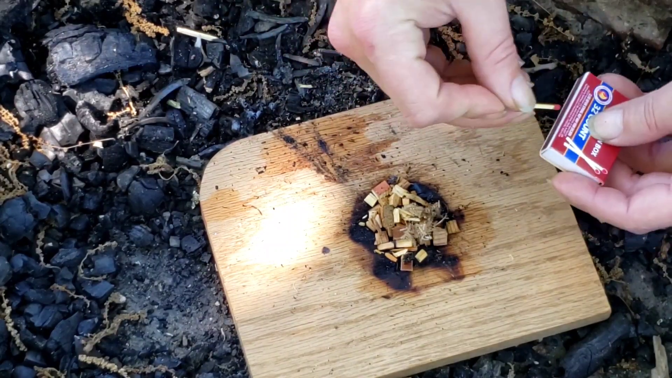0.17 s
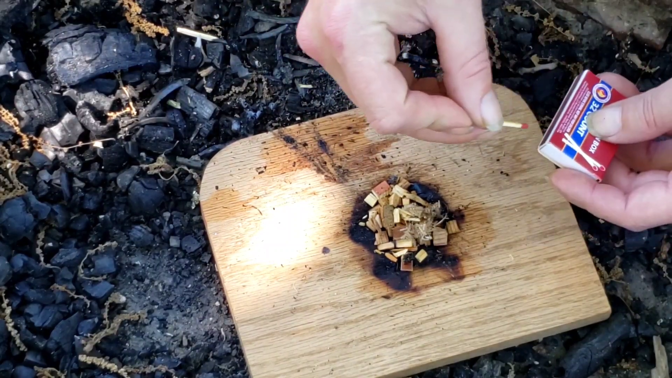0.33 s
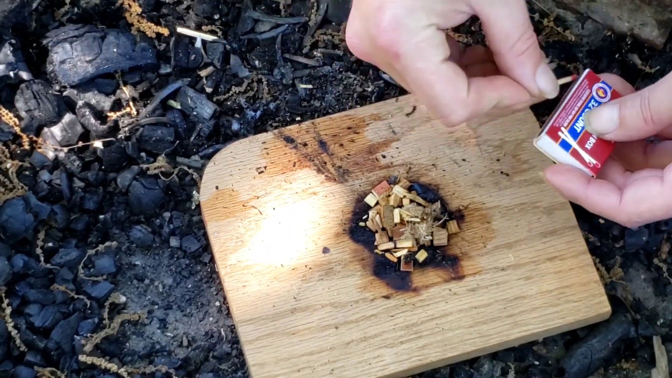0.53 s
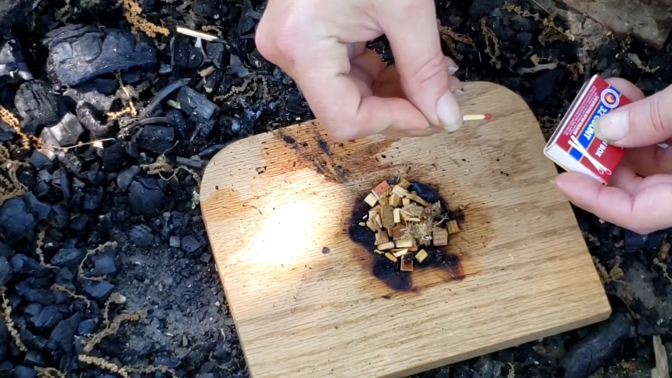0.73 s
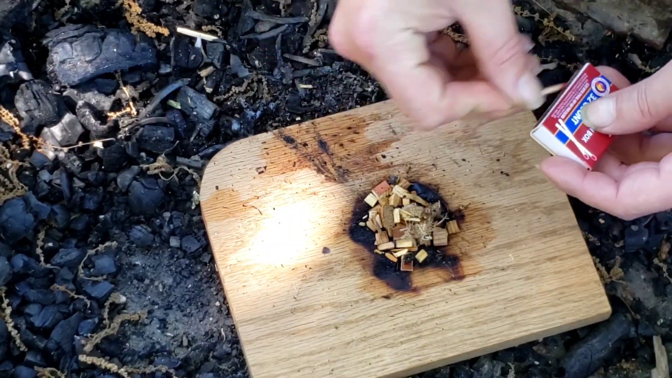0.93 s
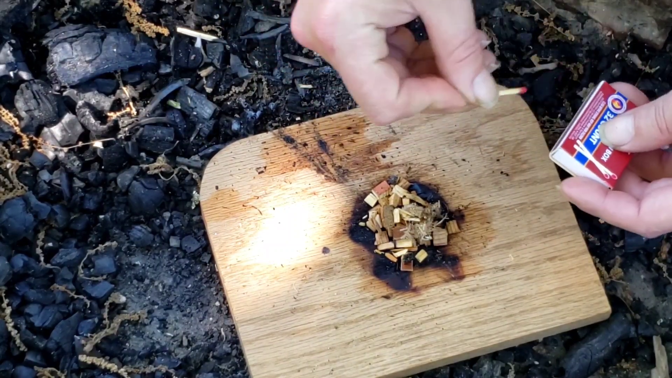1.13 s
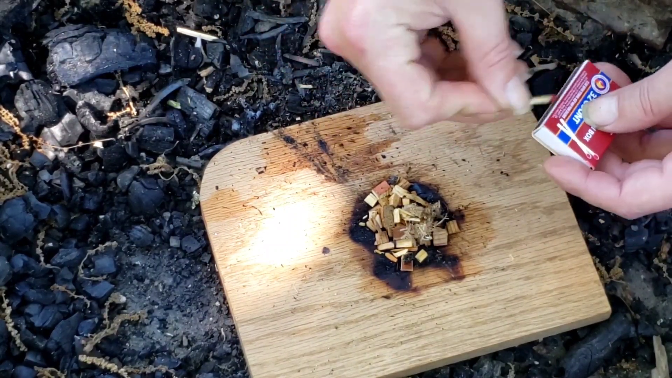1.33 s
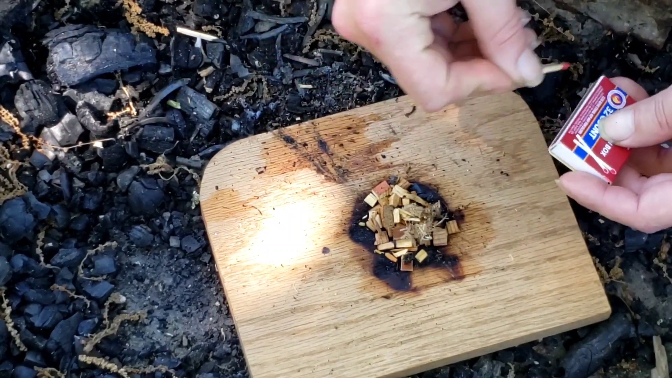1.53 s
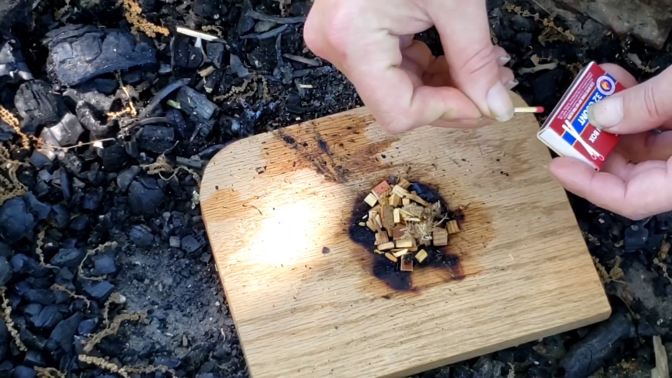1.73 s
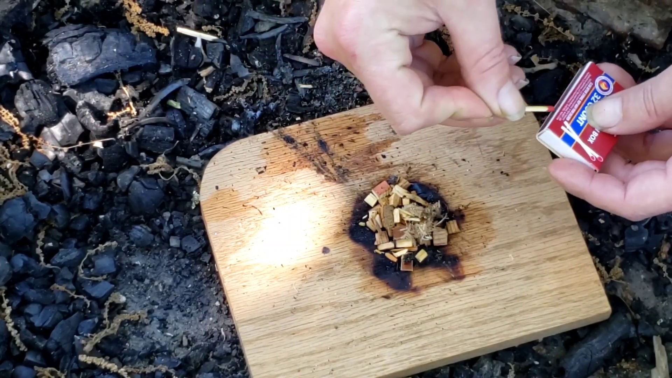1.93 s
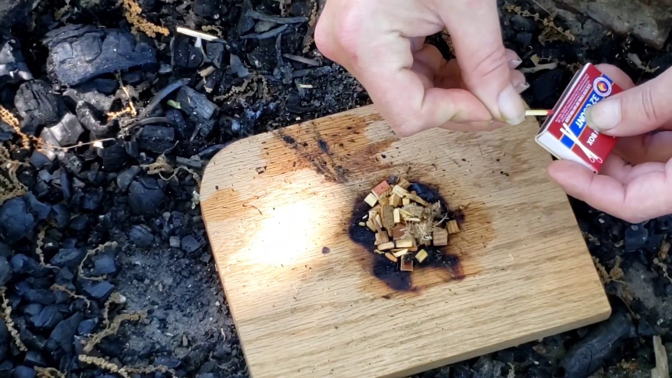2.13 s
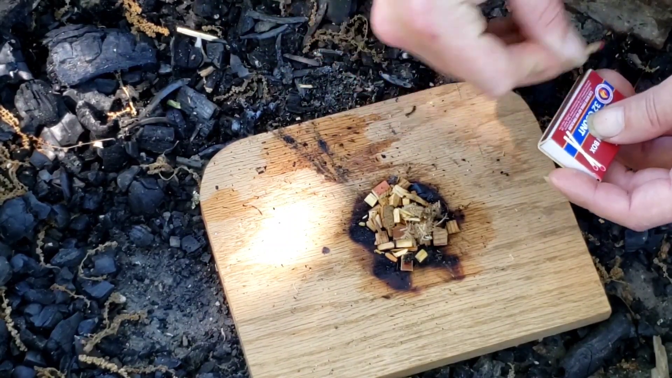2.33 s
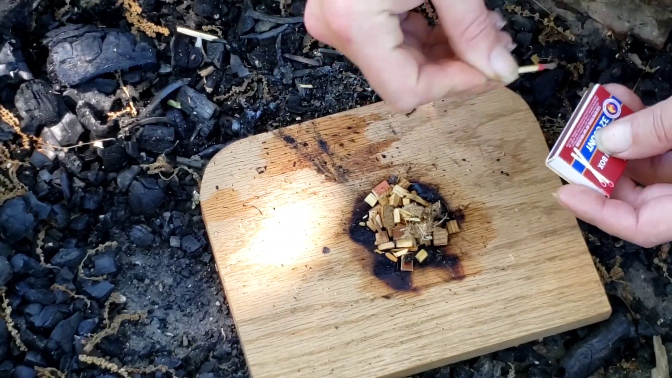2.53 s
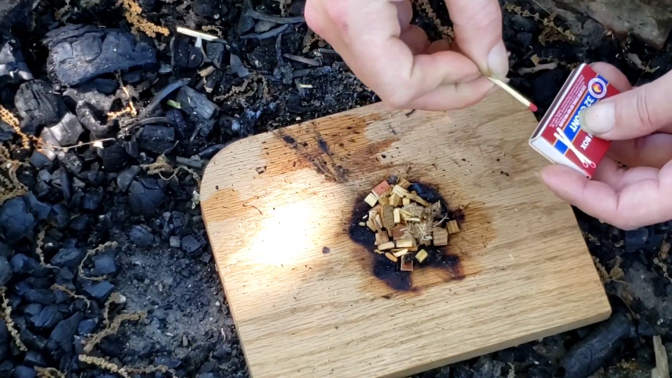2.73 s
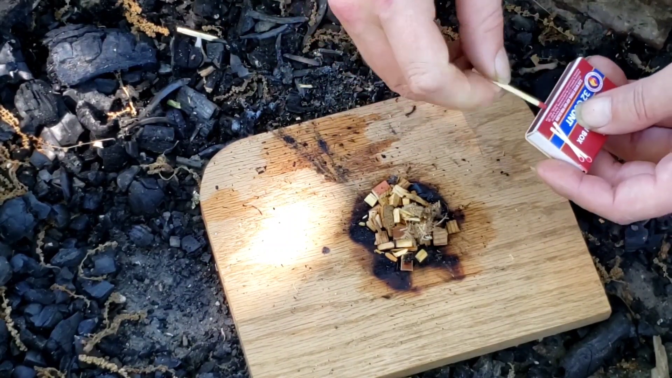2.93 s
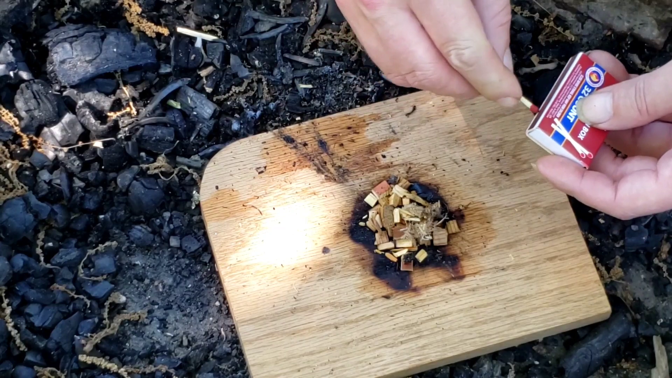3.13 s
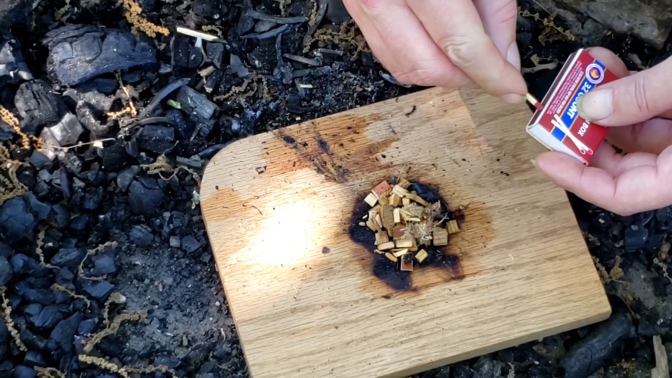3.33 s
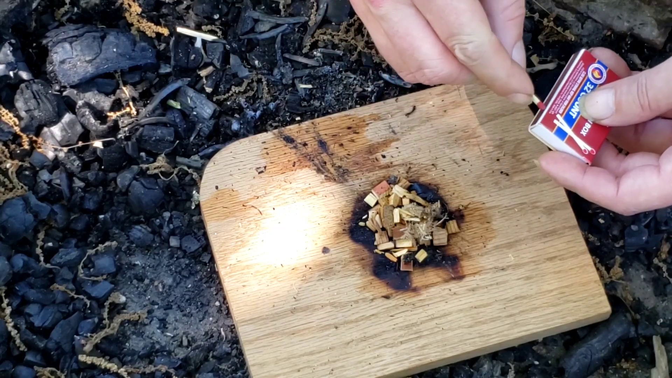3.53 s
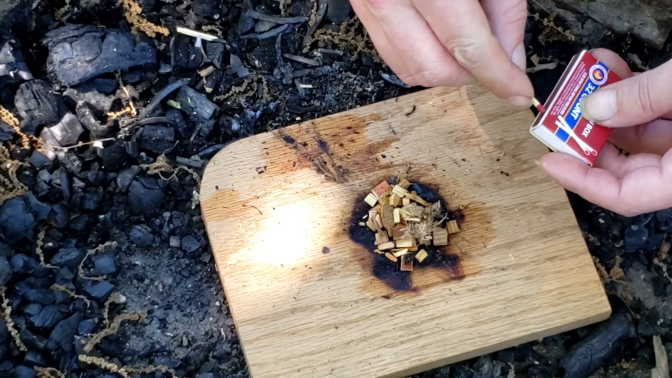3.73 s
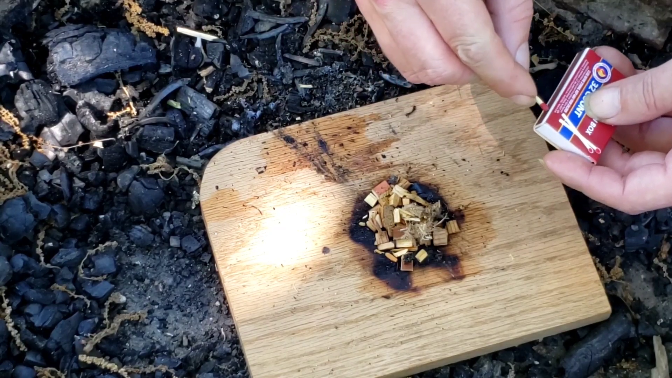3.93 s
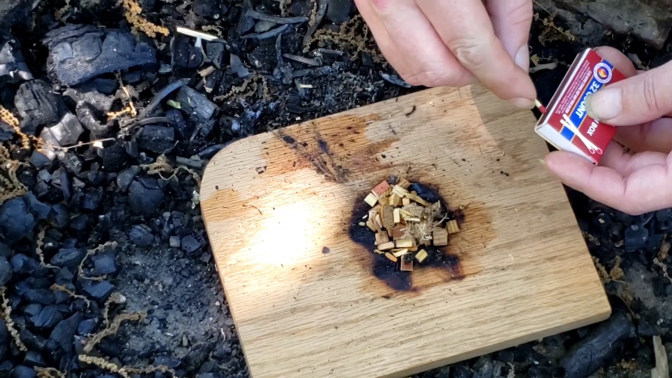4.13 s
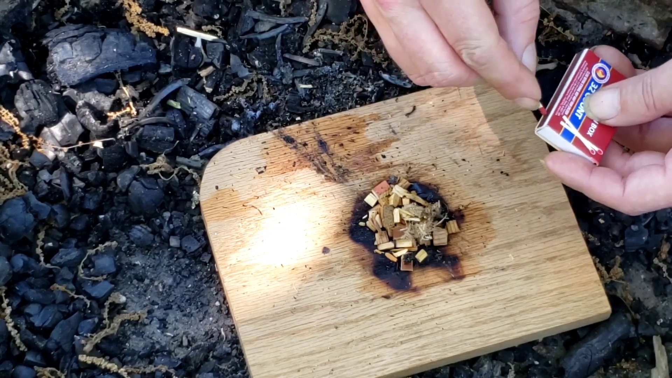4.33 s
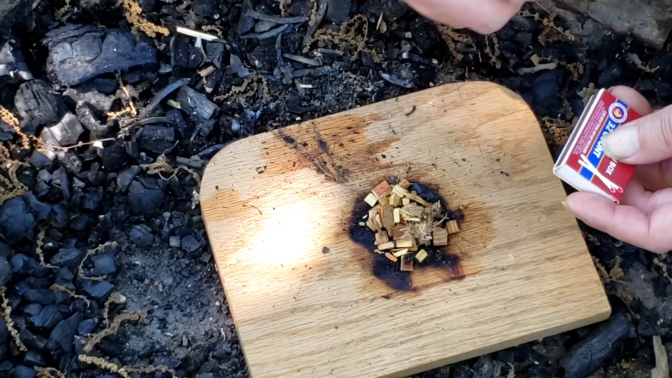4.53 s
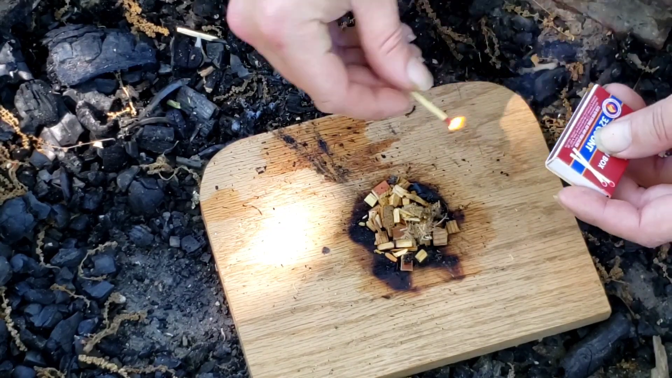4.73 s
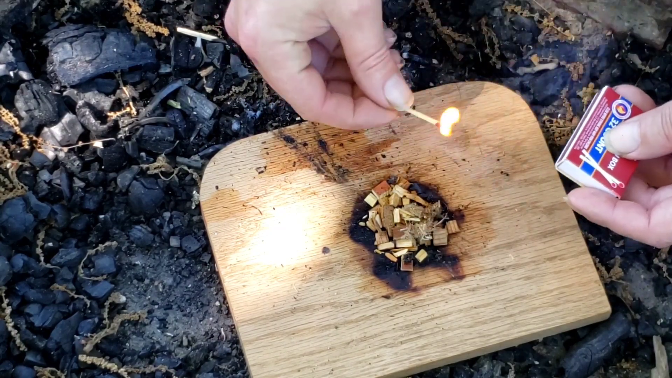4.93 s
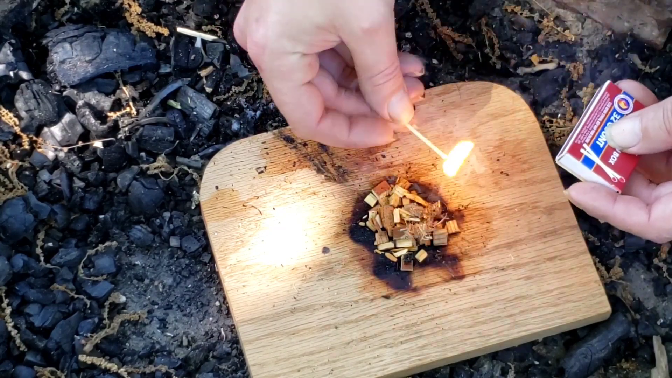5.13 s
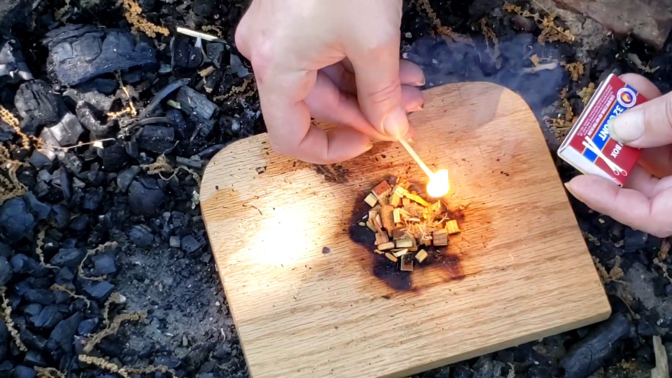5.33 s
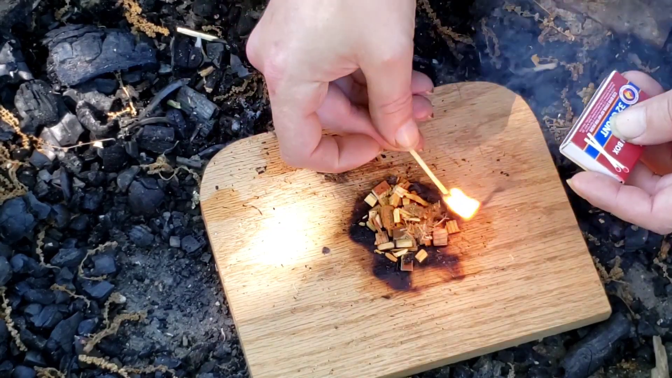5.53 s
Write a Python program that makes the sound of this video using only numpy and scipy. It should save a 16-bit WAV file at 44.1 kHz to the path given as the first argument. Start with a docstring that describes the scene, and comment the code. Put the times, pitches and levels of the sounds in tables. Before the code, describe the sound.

Close, short match strikes on a cardboard box end in a crackling flare and faint hiss, outdoors with wind on the microphone.

```python
"""Striking a match outdoors

Close to the microphone, a match scrapes four times along its box and catches on the fifth stroke.
Grit rings the small cardboard box; the head bursts alight, then hisses and ticks as it burns.
Birds whistle in the distance and a far engine hums, under wind rumbling on the microphone."""
import sys
import numpy as np
from scipy import signal
from scipy.fft import rfft, irfft, next_fast_len
from scipy.io import wavfile
from scipy.ndimage import uniform_filter1d, map_coordinates

SR = 44100
rng = np.random.default_rng(int(sys.argv[2]) if len(sys.argv) > 2 else 0)


def generate_wav(signal):
    """Clip the signal to [-1, 1] and save it as 16-bit WAV at the path in sys.argv[1]."""
    frames = np.transpose(np.atleast_2d(signal))
    scaled = np.clip(frames, -1, 1) * 32767
    pcm = np.round(scaled).astype(np.int16)
    wavfile.write(sys.argv[1], SR, pcm)


N = 245985
TIME = np.arange(N) / SR

# Table levels are relative: each source is filtered and balanced afterwards.
# strokes on the striker: (time [s], length [s], peak after [s], level [dB], build-up [dB], fade [dB],
# box tuning [ratio], further tuning of lowest modes [ratio], of top modes [ratio],
# low modes [dB], high modes [dB], top modes [dB], grit [dB])
STROKES = [(0.5756, 0.072, 0.018, -35.5, 4.5, 10.5, 1.07, 1.05, 1.01, -9, -2.5, -1.5, -10),
           (1.0209, 0.049, 0.0068, -39.5, 13, 1.5, 1.056, 1.46, 0.97, -9.5, 0.5, 4.5, -8),
           (1.4432, 0.059, 0.028, -44.5, 7, 11, 1.02, 1, 1.06, -8, 6, 11.5, 0),
           (2.387, 0.04, 0.023, -38, 1, 0, .99, 1.02, 1.04, 0.5, -5.5, -4, -7),
           (4.486, 0.037, 0.0086, -38.5, 21, 3.5, 0.97, 1.35, 1.04, 10, -10, 10, 6)]
# soft knocks and brushes on the box, and one dull puff of the flame:
# (time [s], level [dB], decay [s], treble edge [Hz], box ring [dB])
TAPS_AND_PUFF = [(0.751, -57, 0.0049, 4000, -2), (2.3834, -26.5, 0.0057, 1250, 5.5),
                 (3.046, -65, 0.032, 15000, -13), (3.054, -58.5, 0.011, 15100, -20),
                 (4.788, -51, 0.012, 1100, 7)]
# coarse grains snapping: (time [s], click [dB], knock on the box [dB])
SNAPS = [(0.5783, -36, -31), (0.5875, -30, -35), (0.5969, -27.5, -39), (1.028, -39, -32), (1.06, -33, -32),
         (1.453, -42, -43), (1.4713, -28, -44), (1.502, -42, -41), (2.379, -45, -42), (2.405, -45, -29),
         (2.423, -50, -27), (2.425, -39, -24.5), (4.4893, -22, -40), (4.533, -30.5, -34)]
# resonances of box and drawer, and the dips between them: (frequency [Hz], width [Hz], gain [dB])
BOX_MODES = [(794, 110, -12), (1072, 91, -10), (1495, 71, -3.5), (1797, 125, 1), (2070, 22, -3.5),
             (2240, 90, 3), (2660, 31, -6), (2920, 64, -5.5), (3440, 96, 0), (3745, 175, -1.5),
             (4080, 130, -6.5), (4570, 190, -5), (5170, 130, -14)]
BOX_DIPS = [(650, 89, -12), (1303, 51, -8.5), (2730, 100, -5.5), (3080, 96, -5.5), (4150, 84, -2.5),
            (5700, 560, -5.5), (9400, 650, -6.5)]
# the head catching: (time [s], level [dB], decay [s])
SPURTS = [(4.4952, -21.5, 0.0089), (4.5055, -20.5, 0.0033), (4.5195, -24, 0.0029)]
# body and treble of the flame's hiss: (time [s], level [dB])
HISS_BODY = [(4.6, -73), (4.76, -68.5), (4.86, -62.5), (5.08, -67), (5.2, -65), (5.38, -63.5), (5.56, -70)]
HISS_TREBLE = [(4.6, -71), (4.7, -63), (4.81, -66.5), (4.87, -62.5), (4.98, -66.5), (5.111, -69),
               (5.2, -64), (5.3, -64), (5.42, -62), (5.56, -64)]
# near echoes of the hiss: (time [s], delay off the hand [s], delay off a board [s])
ECHOES = [(4.6, 0.00058, 0.0015), (4.73, 0.0005, 0.00084), (4.87, 0.0004, 0.00081),
          (5.15, 0.00052, 0.00076), (5.35, 0.000414, 0.00069), (5.56, 0.00046, 0.00071)]
# the loudest pops in the flame: (time [s], level [dB])
POPS = [(5.162, -50), (5.197, -45.5), (5.234, -48), (5.303, -48), (5.327, -53), (5.351, -51),
        (5.394, -34.5), (5.524, -46)]
# shifts of grip: (middle time [s], length [s], level [dB])
RUSTLES = [(2.845, .07, -79), (3.01, 0.079, -78)]
# distant bird notes: (time [s], length [s], start [Hz], middle [Hz], end [Hz], level [dB], crescendo [dB])
WHISTLES = [(0, 0.023, 3950, 4110, 4000, -63, 13.5), (0.044, .022, 4110, 3970, 3600, -63.5, -2),
            (0.093, 0.039, 3600, 3940, 4200, -65.5, 0), (0.137, 0.089, 4500, 4580, 4530, -76, -5),
            (0.217, 0.042, 3800, 3680, 3520, -74, -1), (0.321, 0.033, 3350, 3240, 2910, -73.5, -4),
            (0.393, 0.035, 3750, 3380, 2590, -63, -3), (0.433, 0.04, 2880, 2955, 2560, -61.5, 10),
            (0.466, 0.26, 3680, 3897, 3959, -66.5, 13.5), (1.111, 0.053, 3510, 2255, 2240, -66.5, -7),
            (1.18, 0.039, 2400, 2774, 2670, -61, 8.5), (1.225, 0.014, 2900, 3350, 3660, -68.5, -8),
            (2.222, 0.061, 2620, 2950, 3560, -74, 6), (2.291, 0.068, 3250, 2740, 2220, -71, -7),
            (2.437, 0.057, 2470, 2680, 3570, -69, 4), (5.1, 0.17, 2400, 2620, 2574, -75.5, -3),
            (5.506, 0.088, 2420, 2510, 2580, -74, 20)]
# thin calls of smaller birds: (time [s], length [s], start [Hz], end [Hz], width [Hz], level [dB])
LISPS = [(0.767, 0.11, 6680, 6620, 477, -82.5), (0.93, 0.078, 6130, 5300, 600, -77),
         (1.122, 0.16, 7380, 7560, 900, -82.5), (1.32, 0.12, 8600, 8450, 700, -89),
         (2.007, 0.064, 6600, 6600, 1700, -73.5)]
# far engine's harmonics: (multiple of shaft speed [ratio], level [dB])
ENGINE_ORDERS = [(2, -60.5), (3, -85.5), (4, -71.5), (5, -63.5), (6, -78), (7, -73.5), (9, -82.5),
                 (10, -79.5), (11, -84)]
# gusts on the microphone: (time [s], level [dB])
GUSTS = [(0.0, -51.5), (0.24, -55), (1.2, -52), (1.36, -58), (1.5, -52.5), (1.96, -53.5), (2.14, -49.5),
         (3.04, -57), (3.14, -52), (3.66, -52.5), (4.48, -48.5), (5.56, -50.5)]
# each source's spectrum at the microphone: (frequency [Hz], gain [dB])
GRIT_COLOUR = [(150, -8.5), (600, -18.5), (1200, -19.5), (1600, 0.5), (3500, 5), (5200, -0.5), (5900, -4),
               (6600, 1), (8000, -0.5), (9300, -6), (11700, 4), (14200, 4.5), (16000, -8)]
BURST_COLOUR = [(60, -27), (200, 3.5), (260, 3), (330, 4), (450, -3.5), (620, -4.5), (800, 5.5), (950, -13),
                (1170, 3.5), (1300, -15), (1700, -4), (2400, -10), (2750, -0.5), (3500, -4), (5700, -5.5),
                (6700, -1.5), (7350, -17), (7900, 2), (8950, -21), (9600, -9), (11200, 2), (12800, 4.5),
                (14000, 7), (16000, -5)]
HISS_COLOUR = [(300, 0.5), (1000, -3), (2500, -12), (4000, -7), (5500, -10.5), (7800, -5), (9000, -24.5),
               (10500, -10), (12500, -2.5), (14000, -6.5), (16000, -4)]
BLAZE_COLOUR = [(150, 1), (320, 11.5), (550, -9), (1000, -6), (1500, 7), (2400, -5), (3300, -19),
                (5000, -23)]
SKIN_COLOUR = [(2000, -20), (9000, -14), (12000, 4), (15000, -3)]
WIND_COLOUR = [(20, -16.5), (35, -13), (52, 11), (70, -1), (92, 10), (130, -3), (180, -5), (230, -9),
               (320, -18), (450, -25.5), (800, -36.5), (2000, -77)]
RUSH_COLOUR = [(400, -33), (900, -21), (1450, -4.5), (1950, 2), (2450, -2), (2900, -18.5), (3800, -19.5),
               (6000, -57)]
AIR_COLOUR = [(100, 7.5), (400, 5), (750, 1), (1350, 2.5), (2000, -2), (2550, 1), (3100, -3.5), (4000, -1),
              (5500, -9), (8500, -18), (11500, -8), (16000, -7)]
# stereo balance: (frequency [Hz], left minus right [dB])
BURST_PAN = [(100, 0), (700, 3.5), (2300, 1), (3500, -21), (4500, 7), (6000, -18), (10000, -10.5),
             (12500, -17.5), (14500, 0)]
HISS_PAN = [(1000, 5.5), (4000, -3), (6000, -10.5), (7400, -4.5), (8400, -27), (10000, 1), (12500, -16),
            (15000, -2)]
AIR_PAN = [(500, 1), (1300, 10), (2000, 5), (2550, 12), (3100, 3.5), (4000, 15.5), (5500, -1), (8500, 2),
           (15000, -3)]
# phase offset that widens the match in stereo: (frequency [Hz], left lag [rad])
STEREO_LAG = [(300, 0.21), (1400, 0.42), (2500, 1.99), (4000, 2.05), (8000, 2.17), (11000, 3.8),
              (16000, 1.9)]

BITE_S, LIFT_S, SNAP_DECAY_S = 0.0051, 0.0047, 0.0017
LOWEST_BELOW_HZ, MIDDLE_FROM_HZ, HIGH_FROM_HZ, TOP_FROM_HZ = 1300, 1920, 3200, 4400  # box mode groups
CONTACT_WAVER_DB, CONTACT_PER_S = 3.2, 90
SIZZLE_WAVER_DB, SPUTTER_DB, TREBLE_FROM_HZ = 1.9, 1.3, 9500
HAND_ECHO_GAIN, BOARD_ECHO_GAIN = 0.3, 0.27
CRACKLE_START_S, CRACKLE_PER_S, CRACKLE_SPREAD_DB = 5.15, 14, 3
SHAFT_HZ, DRONE_HZ = 28.53, 96
TOP_HZ = 15600


def scrapes():
    """Close up, the head grips and slips over the grit; each grain clicks and rings the box."""
    slips = grains(rate=3200, spread_db=2.8) * amp(.7 + 2 * walk(380))
    taps, box_taps = taps_and_puff(slips)
    snaps = noise() * bursts([(s, db, SNAP_DECAY_S) for s, db, _ in SNAPS], rise_s=0.00018)
    knocks = noise() * bursts([(s, db, SNAP_DECAY_S) for s, _, db in SNAPS], rise_s=0.0015)
    box = ring(box_taps + knocks, BOX_MODES)
    force = 0
    for stroke in STROKES:
        motion, grip, grit_db = stroke[:6], stroke[6:-1], stroke[-1]
        press = push(*motion)
        modes = held_box(*grip)
        for panel in range(4):  # the sliding head favours now one panel, now another
            contact = amp(CONTACT_WAVER_DB * (walk(CONTACT_PER_S) - .2))
            box = box + ring(slips * press * contact, modes[panel::4])
        force = force + press * amp(grit_db)
    # the finest rasp differs between left and right
    rasp = np.array([grains(rate=1500, spread_db=2.7) for _ in range(2)]) * force
    grit = colour(slips * force + taps + snaps + rasp, GRIT_COLOUR)
    pan = [(500, 1), (1800, 5), (3000, 0.5), (7000, -3), (14000, -2)]
    return place(amp(9) * box + amp(-1) * grit, pan, STEREO_LAG)


def push(s, length, peak_after, db, build_db, fade_db):
    """Pressure of one stroke: it bites, builds to its peak, fades and lifts off."""
    age = TIME - s
    press_db = np.interp(age, [0, min(peak_after, length), length], [db - build_db, db, db - fade_db])
    lift = np.exp(-np.clip((age - length) / LIFT_S, 0, 20))
    return amp(press_db) * ramp(s, BITE_S) * lift


def taps_and_puff(slips):
    """Soft knocks and brushes on the box, and one dull puff of the flame: bare, and as the box's drive."""
    taps, drive = 0, 0
    for s, db, decay, edge_hz, box_db in TAPS_AND_PUFF:
        # each has its own treble edge, from dull knock to light, bright brush
        tap = low_pass(slips * bursts([(s, db, decay)], rise_s=0.0016), edge_hz, order=2)
        taps = taps + tap
        drive = drive + tap * amp(box_db)
    return taps, drive


def held_box(tuning, low_tuning, top_tuning, low_db, high_db, top_db):
    """Modes of the box in the hand: the fingers stiffen it and damp some of its panels."""
    modes = []
    for hz, width, db in BOX_MODES:
        stretch = low_tuning if hz < LOWEST_BELOW_HZ else top_tuning if hz > TOP_FROM_HZ else 1
        group = np.searchsorted((MIDDLE_FROM_HZ, HIGH_FROM_HZ, TOP_FROM_HZ), hz)
        modes.append((hz * tuning * stretch, width, db + (low_db, 0, high_db, top_db)[group]))
    return modes


def panel_dips(x):
    """Narrow dips where the panels of the box cancel each other."""
    return shape(x, lambda f: amp(sum(db / (1 + (2 * (f - hz) / width) ** 2)
                                      for hz, width, db in BOX_DIPS)))


def ignition():
    """The head goes off near the microphone in a few crackling spurts of gas."""
    crackle = grains(rate=20000, spread_db=1.9) + amp(-11) * stereo_noise()
    spurts = crackle * bursts(SPURTS, rise_s=0.00087)
    return place(colour(spurts, BURST_COLOUR), BURST_PAN, STEREO_LAG)


def flame_hiss():
    """Gas jets sizzle from the head; near echoes comb the hiss and slide as the match moves."""
    gas = colour(np.array([grains(rate=14000, spread_db=2) for _ in range(2)]), HISS_COLOUR)
    jets = gas
    times, *delays = np.transpose(ECHOES)
    for delay, gain in zip(delays, (HAND_ECHO_GAIN, BOARD_ECHO_GAIN)):
        clock = (TIME - np.interp(TIME, times, delay)) * SR
        echo = np.array([map_coordinates(side, [clock], order=5, mode="mirror") for side in gas])
        jets = jets + gain * echo
    jets = unit(jets) * amp(SPUTTER_DB * walk(90))
    hiss = 0
    for hz in np.linspace(3000, 16000, 14):  # each band wavers on its own
        band = low_pass(jets, hz, order=48)
        jets = jets - band
        level_db = follow(HISS_TREBLE if hz > TREBLE_FROM_HZ else HISS_BODY)
        hiss = hiss + band * amp(level_db + SIZZLE_WAVER_DB * walk(16))
    return place(hiss * amp(-1) * ramp(start_s=4.5, rise_s=0.035), HISS_PAN)


def flame_pops():
    """Tiny blisters pop on the hot head, to the right: a few loud ones, and fainter ones by chance."""
    chance = (rng.random(N) < CRACKLE_PER_S / SR) * (TIME > CRACKLE_START_S)
    clicks = chance * amp(-53 + CRACKLE_SPREAD_DB * noise())
    for s, db in POPS:
        clicks[int(s * SR)] += amp(db)
    blister = [(10530, 420, 0)]
    pings = ring(ring(clicks, blister), blister)
    ticks = colour(clicks, [(3000, -24), (9000, -22), (11000, 3.5), (15000, -10)])
    return (amp(16.5) * pings + amp(6) * ticks) * sides(-14)


def flame_flutter():
    """The growing flame flutters softly on the left."""
    blaze = unit(colour(noise(), BLAZE_COLOUR)) * amp(-71.5 + 2 * walk(22))
    return blaze * ramp(start_s=4.96, rise_s=0.34) * sides(11)


def fingers():
    """Skin brushes softly along the matchstick, close by."""
    touch = sum(amp(db) * np.cos(np.pi * np.clip((TIME - s) / length, -.5, .5))
                for s, length, db in RUSTLES)
    return unit(colour(stereo_noise(), SKIN_COLOUR)) * touch


def bird_whistles():
    """Distant birds, a little to the left: each fluttering note glides along one arc of pitch."""
    song = np.zeros(N)
    waver = 1 + 0.01294 * walk(300)
    for s, length, start_hz, middle_hz, end_hz, db, crescendo_db in WHISTLES:
        arc = np.polyfit([0, .5, 1], [start_hz, middle_hz, end_hz], 2)
        hz = np.polyval(arc, ramp(s, length))
        voice = swell([s, s + length], [db - crescendo_db / 2, db + crescendo_db / 2], edge_s=0.0024)
        song += np.sqrt(2) * voice * tone(hz * waver)
    return song * amp(2.5 * walk(110) - 2) * sides(2.3)


def bird_lisps():
    """Smaller birds call in high tones so unsteady that they blur into narrow bands."""
    lisps, hiss = np.zeros(N), noise()
    for s, length, start_hz, end_hz, width, db in LISPS:
        hz = np.interp(TIME, [s, s + length], [start_hz, end_hz])
        flutter = unit(low_pass(hiss, width / 2, order=4))
        lisps += swell([s, s + length], [db, db], edge_s=0.036) * flutter * tone(hz)
    return lisps


def engine():
    """Far off, harmonics of a slowly turning shaft fade in and out on their way, beside a second drone."""
    turns = np.cumsum(SHAFT_HZ * (1 + 0.0032 * walk(2.31))) / SR
    hum = sum(amp(db + 2 * walk(8)) * np.sin(2 * np.pi * (multiple * turns + rng.random()))
              for multiple, db in ENGINE_ORDERS)
    drone = amp(-64.5 + 2 * walk(3.9)) * tone(DRONE_HZ * (1 + 0.012 * walk(6.8)))
    return np.sqrt(2) * (hum + drone)


def wind():
    """Gusts rumble on the microphone, mostly alike on both sides."""
    gust_db = follow(GUSTS) - 4.5 + 0.77 * walk(9.9)
    buffeting = noise() + amp(-10.5) * stereo_noise()
    return unit(colour(buffeting, WIND_COLOUR)) * amp(gust_db)


def open_air():
    """Faint, wide air all around; off to the left a soft rushing sets in and holds."""
    air = place(unit(colour(stereo_noise(), AIR_COLOUR)), AIR_PAN) * amp(-73.5 + 0.29 * walk(5.6))
    rush = unit(colour(stereo_noise(), RUSH_COLOUR)) * amp(-62 + walk(40))
    return air + rush * ramp(start_s=4.28, rise_s=0.076) * amp([[0], [-17]])


def scatter(x, t60_s, wet_db, treble_db):
    """Ground, leaves and trunks throw back a thin, short tail."""
    age = TIME[:SR // 2]
    tail = rng.standard_normal((2, len(age))) * amp(-60 * age / t60_s) * (age > .004)
    tail = tail / np.sqrt(np.sum(tail ** 2, axis=1, keepdims=True))
    echo = signal.fftconvolve(x, tail, axes=1)[:, :N]
    return x + amp(wet_db) * colour(echo, [(300, 11), (2000, -0.5), (5000, 0), (13000, treble_db)])


def place(x, pan, lag=((20, 0), (20000, 0))):
    """Widen the sound: level and phase differ between left and right, by frequency."""
    split = np.array([[.5], [-.5]])
    return shape(x, lambda f: sides(curve(pan, f)) * np.exp(-1j * curve(lag, f) * split))


def sides(pan_db):
    return amp(np.array([[.5], [-.5]]) * pan_db)


def amp(db):
    return 10 ** (np.asarray(db) / 20)


def unit(x):
    return x / np.sqrt(np.mean(x ** 2))


def noise():
    return rng.standard_normal(N)


def stereo_noise():
    return np.array([noise(), noise()])


def tone(hz):
    return np.sin(2 * np.pi * np.cumsum(hz) / SR)


def grains(rate, spread_db):
    """Dense random clicks, a few much bigger than the rest."""
    size = amp(spread_db * np.minimum(rng.exponential(size=N), 3.5))
    return unit((rng.random(N) < rate / SR) * size * np.sign(noise()))


def walk(rate):
    """Smooth random drift with a spread near 1, at `rate` steps a second."""
    hold = int(SR / rate)
    steps = rng.standard_normal(N // 40)
    return uniform_filter1d(steps[np.arange(N) // hold], hold)


def ramp(start_s, rise_s):
    return np.clip((TIME - start_s) / rise_s, 0, 1)


def follow(points):
    """Join (time [s], level [dB]) points."""
    return np.interp(TIME, *np.transpose(points))


def swell(times, db, edge_s):
    """A level curve that is silent outside its span, with soft edges."""
    gain = amp(np.interp(TIME, times, db)) * (TIME >= times[0]) * (TIME <= times[-1])
    return uniform_filter1d(gain, int(edge_s * SR))


def bursts(rows, rise_s):
    """Envelope of quick attacks that die away; their powers add."""
    power = np.zeros(N)
    for s, db, decay in rows:
        age = np.maximum(TIME - s, 0)
        power += (amp(db) * (1 - np.exp(-age / rise_s)) * np.exp(-np.minimum(age / decay, 20))) ** 2
    return np.sqrt(power)


def curve(points, hz):
    """Join points on a log-frequency axis."""
    frequencies, values = np.transpose(points)
    return np.interp(np.log(hz + 1), np.log(frequencies), values)


def shape(x, response):
    """Filter by a function of frequency."""
    size = next_fast_len(N + 4096, True)
    hz = np.arange(size // 2 + 1) * SR / size
    return irfft(rfft(x, size) * response(hz), size)[..., :N]


def colour(x, points):
    return shape(x, lambda f: amp(curve(points, f)))


def low_pass(x, hz, order):
    return shape(x, lambda f: 1 / (1 + (f / hz) ** order))


def ring(x, modes):
    """Damped resonances side by side; each radiates poorly below its own pitch."""
    return shape(x, lambda f: sum(
        amp(db) * np.minimum(f / hz, 1) * 1j * f * width / (hz ** 2 - f ** 2 + 1j * f * width)
        for hz, width, db in modes))


def scene():
    """The match in front, birds and engine far behind, wind on the microphone."""
    strokes = scatter(panel_dips(scrapes()), t60_s=0.3, wet_db=-18.5, treble_db=-1)
    burst = scatter(ignition(), t60_s=0.22, wet_db=-23, treble_db=-19)
    birds = scatter(bird_whistles() + bird_lisps(), t60_s=0.45, wet_db=-1.5, treble_db=6)
    flame = flame_hiss() + flame_pops() + flame_flutter()
    return strokes + burst + flame + fingers() + birds + engine() + wind() + open_air()


def record(dry):
    """The recorder cuts the highest treble steeply."""
    return signal.sosfilt(signal.ellip(10, .2, 70, TOP_HZ, fs=SR, output="sos"), dry)


dry = scene()
out = record(dry)
generate_wav(out)
```